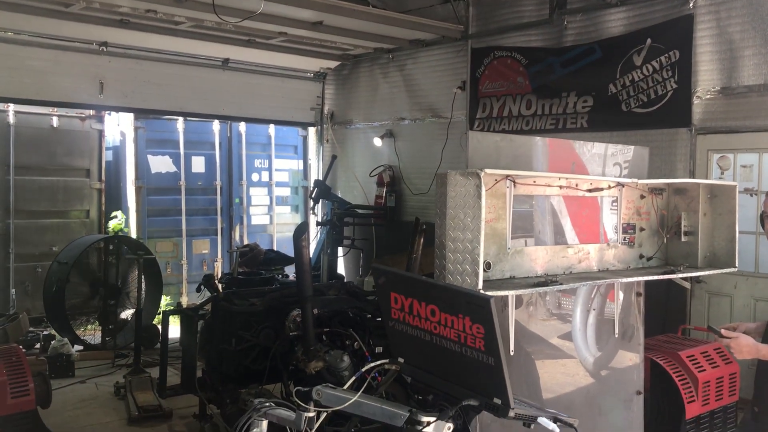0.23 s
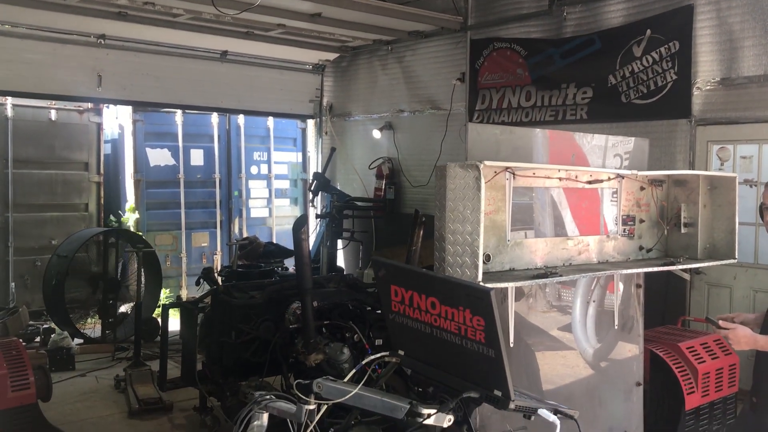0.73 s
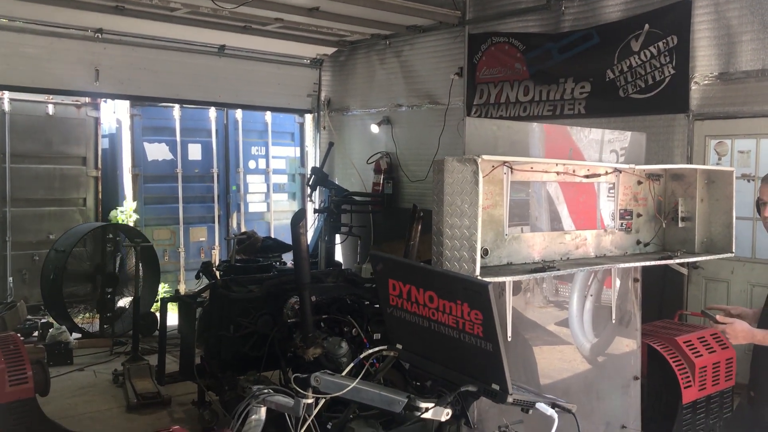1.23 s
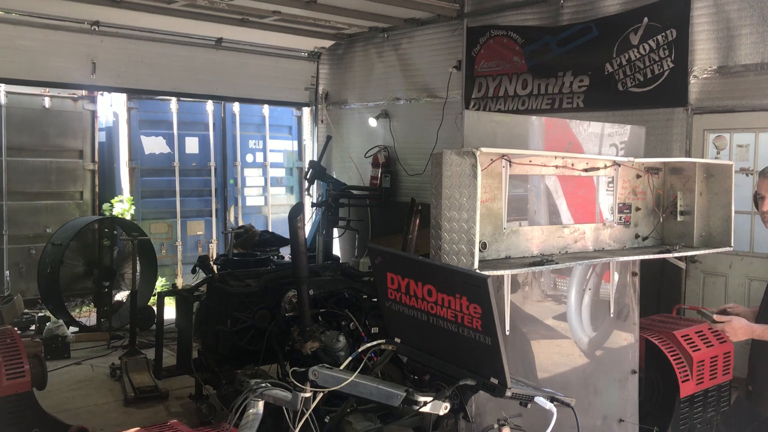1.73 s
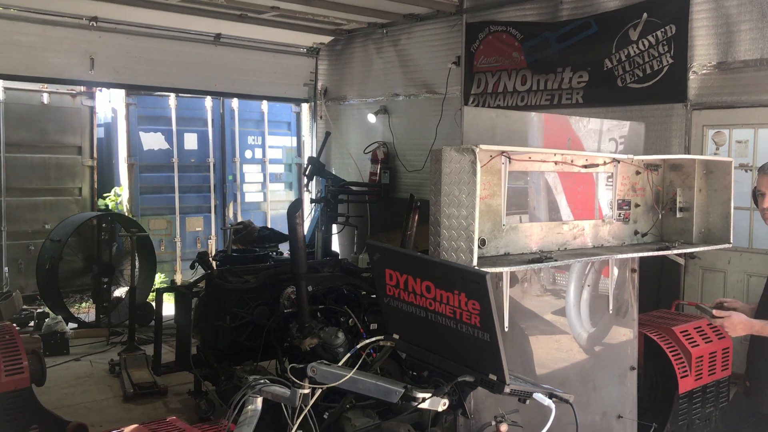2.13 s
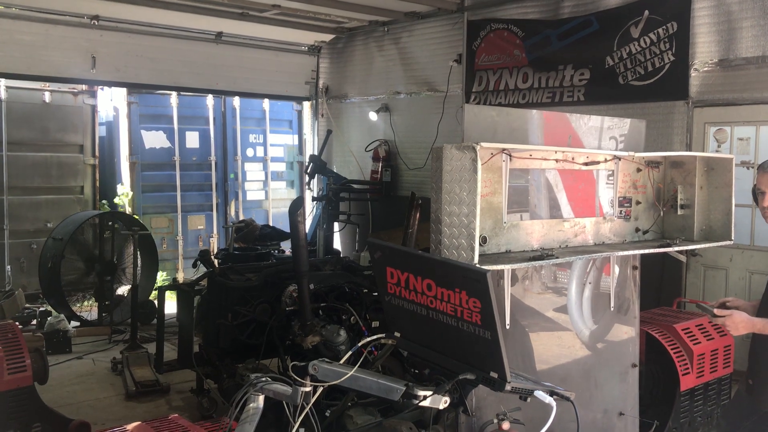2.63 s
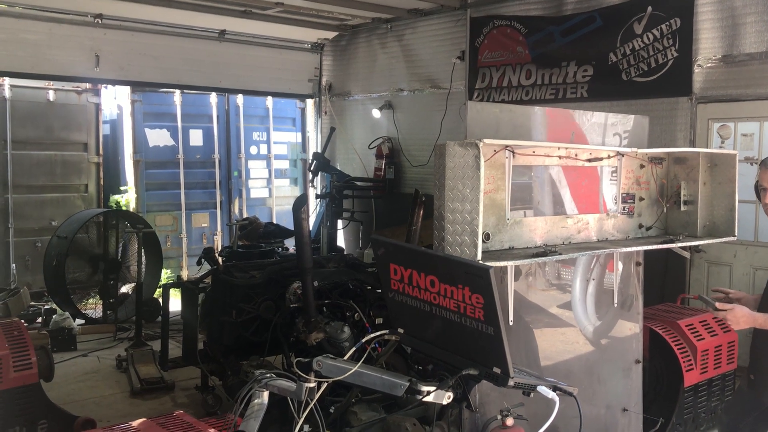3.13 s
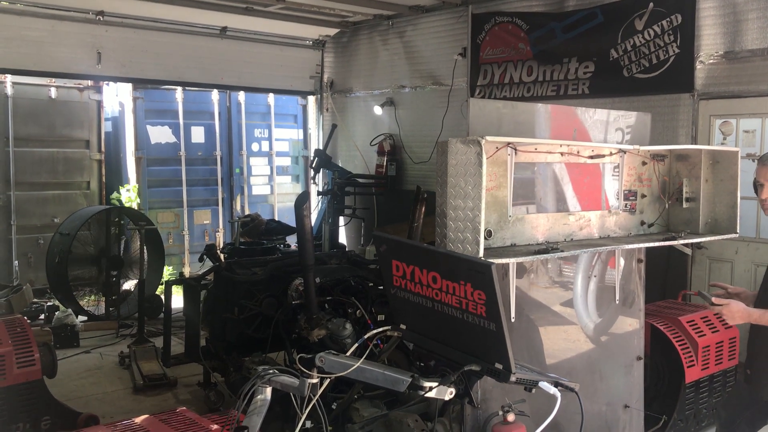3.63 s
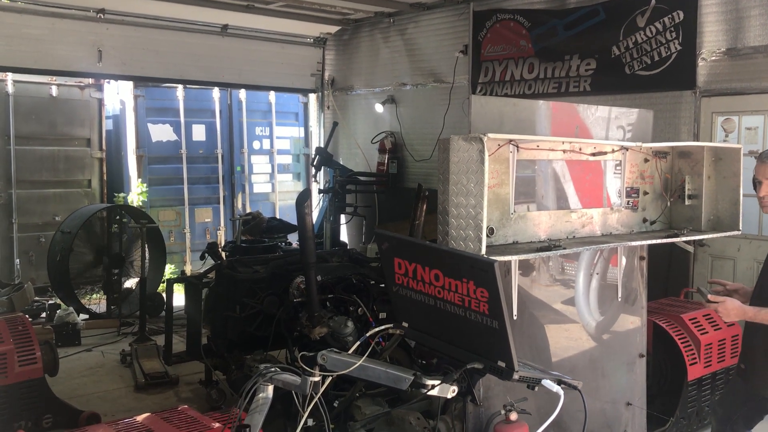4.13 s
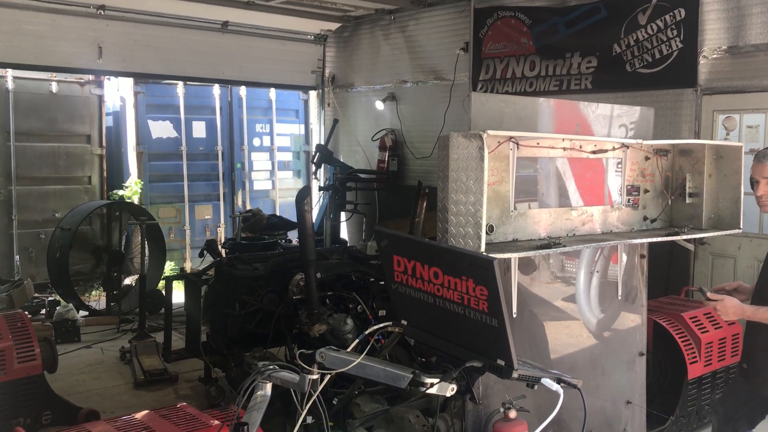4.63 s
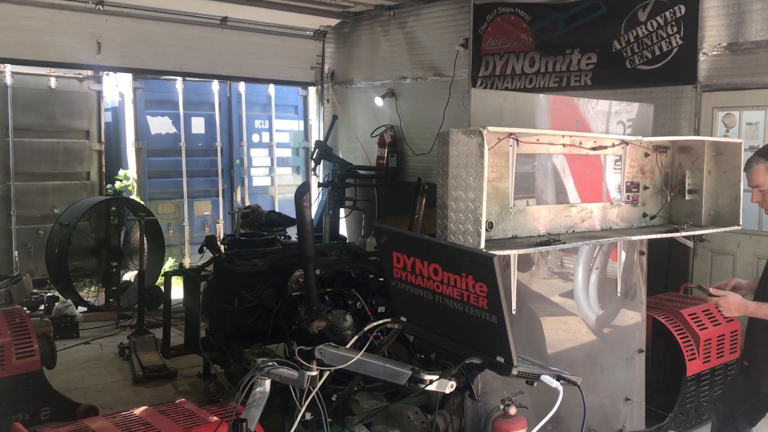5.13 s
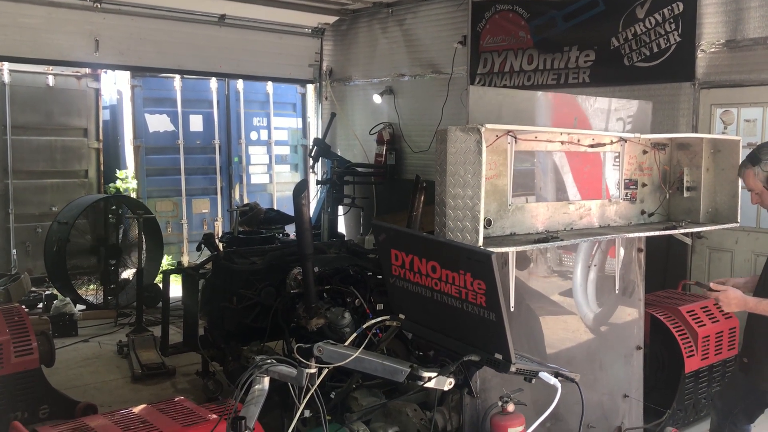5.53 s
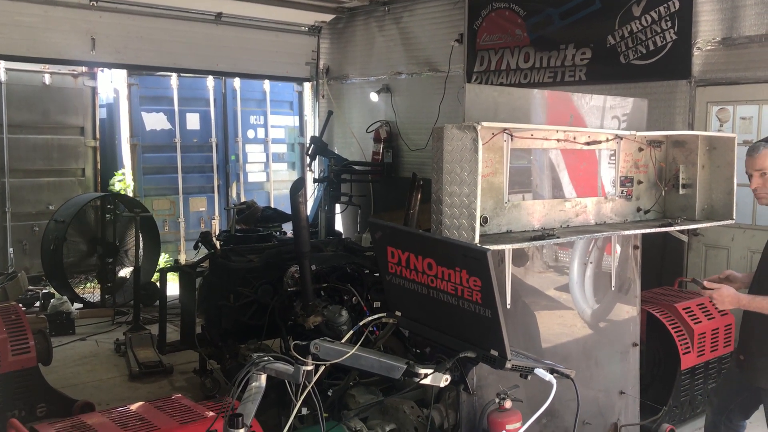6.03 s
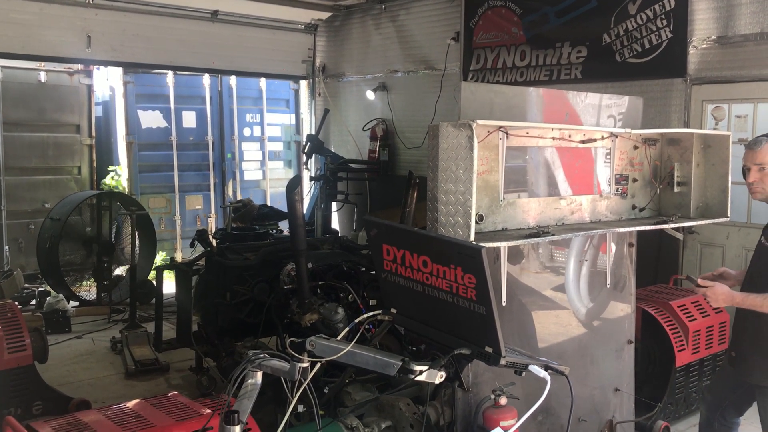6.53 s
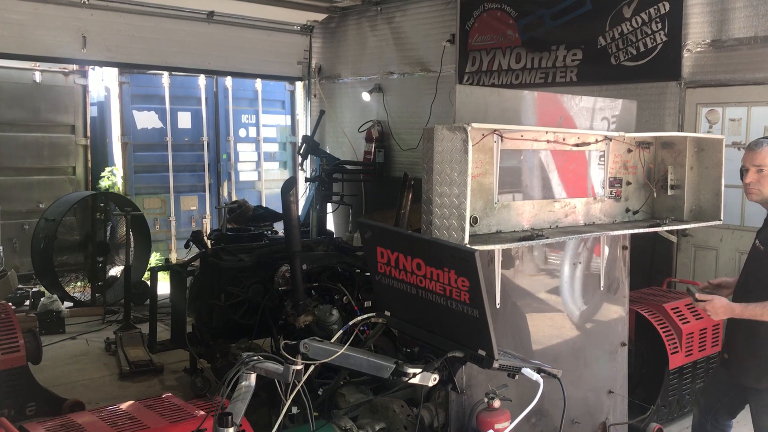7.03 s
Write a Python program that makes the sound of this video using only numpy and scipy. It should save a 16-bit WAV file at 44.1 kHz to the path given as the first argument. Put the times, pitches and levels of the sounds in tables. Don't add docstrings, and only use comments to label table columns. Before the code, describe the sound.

A big V8 with open exhaust stacks revs up, falls back, then roars loudly and climbs under load inside a sheet-metal workshop.

```python
import sys
import numpy as np
from scipy import signal
from scipy.fft import rfft, irfft
from scipy.io import wavfile
from scipy.ndimage import uniform_filter1d

SR = 44100
rng = np.random.default_rng(int(sys.argv[2]) if len(sys.argv) > 2 else 0)


def generate_wav(sig):
    pcm = np.round(np.clip(np.atleast_2d(sig).T, -1, 1) * 32767).astype(np.int16)
    wavfile.write(sys.argv[1], SR, pcm)


def elevation(decibels):
    levels = np.asarray(decibels, float)
    return 10 ** (levels / 20)


N = 321489
HZ = np.arange(N // 2 + 1) * SR / N
TIME = np.arange(N) / SR

# t/s, firing rate/Hz
CRANK_SPEED = [(-.398, 34.58), (.182, 71.21), (.512, 84.67), (1.092, 90.37), (1.722, 137.17),
               (2.082, 149.81), (2.682, 97.54), (3.022, 96.2), (3.542, 153.7), (3.762, 148.12),
               (4.162, 112.55), (4.412, 105.48), (5.092, 117.14), (5.862, 108.99), (6.142, 114.33),
               (6.602, 141.19), (7.062, 163.72), (7.702, 178.1)]
# t/s, jet level/dB
THROTTLE_FLOW = [(0, -28), (.14, -27.5), (.45, -30.5), (.8, -38.5), (.95, -38), (1.25, -29.5), (1.37, -31),
                 (1.5, -34.5), (2.0, -36), (2.4, -37), (2.85, -34), (3.05, -26.5), (3.4, -19), (3.9, -18),
                 (4.15, -20.5), (6.1, -20.5), (6.8, -18.5), (7.29, -17.5)]
# lope share (sign = bank), extra path/ms, jet level/dB
CYLINDERS = [(.22, .03, 1.2), (-1.6, -.3, -14), (.62, .33, -3), (.55, 0.0, -1), (-1.3, -.5, -15),
             (.7, .17, -3), (-1.3, -.32, -11), (-1.4, .48, -16)]
# firing rate/Hz, thump level/dB, lope level/dB
SHOP_ANSWER = [(60, -14.5, -21), (77, -10, -20), (92.5, -16, -20.5), (98.9, -21.5, -26),
               (111, -15.5, -15.5), (104.6, -11.5, -23), (129, -11, -21), (135.3, -11, -23),
               (143, -12.5, -18.5), (138, -13.5, -23), (156, -30, -18), (169, -19, -18)]
# f/Hz, lag/firing gaps
THUMP_LAG = [(60, -.5), (85, -.11), (100, 0.0), (113, .28), (130, .55), (145, .9), (168, 1.85)]
# f/Hz, width/Hz, level/dB
BOOM_MODES = [(68.4, 33, -7.5), (112.2, 17.5, 5.5), (140.6, 10.3, 3), (154, 14, -7), (179.7, 20.2, -4),
              (211.3, 3.2, -7), (275, 32.3, -4), (308, 16, -8), (347, 18.6, -10), (407.6, 17, -10.5)]
# f/Hz, width/Hz, level/dB
SHARED_MODES = [(226, 14, -9), (251.6, 28, -11.5), (422.4, 8.2, -13.5)]
# f/Hz, width/Hz, level/dB
SHEET_MODES = [(490, 95, -8.5), (568, 19, -3), (606, 39, -6), (645, 19.3, 2.5), (718, 43, -4),
               (812, 12.4, -0.5), (866, 21, -1), (934, 20, 1.5), (954, 3.5, 4.5), (980, 11, 2.5),
               (1052, 29, -0.5), (1168, 54, -4.5), (1224, 39, -3.5), (1244.5, 16, 0), (1341, 29, -6),
               (1433, 74, -10.5), (1552, 157, -9.5)]
# f/Hz, width/Hz, level/dB
COOL_MODES = [(589, 35, 1.5), (785, 30, 3)]
# f/Hz, density level/dB per Hz
JET_COLOUR = [(760, -20), (1300, -6), (1590, -1.5), (2040, -2.5), (2290, -1), (2730, -2.5), (3260, 0.5),
              (3980, -1), (4850, -5), (6990, -3.5), (8620, -6), (10300, -11), (12700, -11), (15200, -16.5),
              (15800, -22)]
# f/Hz, width/Hz, level/dB
PANEL_MODES = [(2560, 20, -0.5), (2480, 64, -12), (2871, 13, 3), (3150, 18, -12)]
JET_EDGES_HZ = [1200, 2800, 5200, 7800, 10400, 13000, 17000]
# t/s, f/Hz, level/dB
BELT_SQUEAL = [
    (.4, 1970, -82),
    (.5, 2030, -43),
    (.68, 2100, -49),
    (.85, 2160, -50),
]

FIRST_FIRING = 3.858
FLYWHEEL_S = .28
FULL_LOAD_DB = -20
THUMP_PER_LOAD, LOPE_PER_LOAD, BARK_PER_LOAD = 0.25, 0.078, 0.42
BARK_DB, BARK_DB_PER_HZ = -25, 0.0321
BLIP_S, BLIP_LENGTH_S, BLIP_BARK_DB = 1.18, 0.19, 4.5
GEAR_ORDER, GEAR_DB = 7, -28.5
HOWL_ORDER = 21 / 8
HOWL_DB, HOWL_DB_PER_HZ = -38.5, 0.2563
TOP_HZ = 15870


def crank():
    span = int(FLYWHEEL_S * SR)
    t_s = np.arange(-span, N + span) / SR
    hz = np.interp(t_s, *np.transpose(CRANK_SPEED))
    return uniform_filter1d(uniform_filter1d(hz, span), span)[span:-span]


def firings(phase, size, path_ms):
    count = np.arange(np.ceil(phase[0]), phase[-1] - 1).astype(int)
    at = np.interp(count, phase, np.arange(N)) + path_ms[count] * SR / 1000
    whole = at.astype(int)
    pulses = np.zeros(N)
    pulses[whole] = size[count] * (1 - at + whole)
    pulses[whole + 1] = size[count] * (at - whole)
    return pulses


def puffs(phase, size, width):
    nearest = np.round(phase).astype(int)
    return size[nearest] * np.exp(-((phase - nearest) / width) ** 2)


def thump(phase, hz, chance):
    wobble = uniform_filter1d(chance[phase.astype(int)], 800)
    lag = np.interp(hz, *np.transpose(THUMP_LAG))
    return np.sqrt(2) * elevation(.8 * wobble) * np.cos(2 * np.pi * (phase - lag))


def lope(phase, hz, push, path_ms, chance, idle):
    slow = np.clip((108 - hz) / 25, 0, 1)
    near = firings(phase, push * (push > 0), path_ms)
    far = firings(phase, push * (push < 0), path_ms)
    echoes = sum(shop(bank, t60_s=.35, treble_t60_s=.2, wet_db=-3) - bank for bank in (near, far))
    blows = (near + far + through(echoes, band(160, 760))) / np.std(near + far)
    shared = through(unit(firings(phase, np.ones_like(push), path_ms)), modes(SHARED_MODES))
    misfire = unit(firings(phase, chance, path_ms)) * (.1 + .35 * slow)
    swirl = through(rng.standard_normal(N), band(190, 700)) * (.22 + .3 * slow)
    boom = modes(BOOM_MODES) * band(52, 540) * band(40, 480)
    sound = through(blows + misfire + swirl, boom) + shared

    deep = through(sound, band(20, 155))
    top = through(sound, band(385, 700))
    deep_gain = elevation(-.13 * (hz - 71.5) * idle)
    top_gain = elevation(0.14 * (hz - 103) - 9.2 * idle)
    sound = sound + (deep_gain - 1) * deep + (top_gain - 1) * top

    upper = through(sound, band(153.4, 620))
    level = uniform_filter1d(np.abs(upper), SR // 4)
    return sound * uniform_filter1d(np.abs(steady(upper)), SR // 4) / level


def bark(phase, hz, push, path_ms, jet_db, chance, idle):
    blows = unit(firings(phase, push * elevation(2.5 * chance), path_ms))
    even = unit(firings(phase, np.ones_like(push), path_ms))
    puff = (.5 + puffs(phase, elevation(.5 * jet_db), width=0.37)) * rng.standard_normal(N)
    gear = np.cos(2 * np.pi * GEAR_ORDER * phase)
    drive = 0.5 * blows + 0.27 * even + elevation(GEAR_DB) * gear + unit(puff)
    rung = through(drive, modes(SHEET_MODES) * band(454, 2000))
    cool = np.clip((96 - hz) / 9, 0, 1)
    rung = rung + cool * through(rung, np.abs(modes(COOL_MODES)))
    return steady(rung - 0.79 * idle * through(rung, 1 - band(630, 550)))


def jets(phase, rate, jet_db, chance, load_db, idle):
    hz, db = np.transpose(JET_COLOUR)
    colour = elevation(np.interp(np.log(HZ + 1), np.log(hz), db)) * np.abs(1 + modes(PANEL_MODES))
    choked = elevation(-1.8 * np.clip(-32.5 - load_db, 0, 6))
    # roar under load, extra roar at idle, dB gained per dB of load
    bands = [(0.69, 0.19, 0.27), (1.0, -0.34, 0.29), (0.52, 0.04, 0.21),
             (0.49, -0.29, -0.26), (0.57, -0.32, -0.3), (0.31, -0.1, -0.39)]
    out = 0
    for k, (bed, idle_bed, thin) in enumerate(bands):
        spread_db = np.minimum(2.4 * chance[0] + 3.6 * chance[k + 1], 5.)
        crack = choked * puffs(phase, elevation(jet_db + spread_db), width=.28)
        flow = (bed + idle_bed * idle + crack) * rng.standard_normal(N)
        part = through(unit(flow), colour * band(*JET_EDGES_HZ[k:k + 2]))
        treble = max(k - 2, 0)
        gain = elevation(thin * (load_db + 18) - 0.0051 * treble * (rate - 110))
        out = out + gain * choked ** (0.22 * treble) * part
    return steady(out)


def howl(phase, hz, idle):
    return elevation(HOWL_DB + HOWL_DB_PER_HZ * (hz - 111)) * idle * np.cos(2 * np.pi * HOWL_ORDER * phase)


def whine():
    t_s, hz, db = np.transpose(BELT_SQUEAL)
    tone = np.sin(2 * np.pi * np.cumsum(np.interp(TIME, t_s, hz)) / SR)
    return elevation(np.interp(TIME, t_s, db, left=-120, right=-120)) * tone


def rumble():
    return unit(through(rng.standard_normal(N), band(28, 52)))


def shop(x, t60_s, treble_t60_s, wet_db):
    age_s = TIME[:SR]
    low, high = (rng.standard_normal(SR) * np.exp(-np.log(1000) * age_s / t60) * (age_s > .006)
                 for t60 in (t60_s, treble_t60_s))
    dull = 1 / (1 + (HZ / 4000) ** 2)
    tail = rfft(low, N) * dull + rfft(high, N) * (1 - dull)
    echoes = elevation(wet_db) * irfft(tail, N)[:SR] / np.sqrt(np.sum(low ** 2))
    already = np.r_[x[SR:0:-1], x]
    return x + signal.fftconvolve(already, echoes)[SR:SR + N]


def modes(table):
    response = 0
    for k, (f, w, db) in enumerate(table):
        response = response + (-1) ** k * elevation(db) * 1j * w * HZ / (f ** 2 - HZ ** 2 + 1j * w * HZ)
    return response


def band(lo_hz, hi_hz):
    return 1 / np.sqrt((1 + (lo_hz / (HZ + 1)) ** 8) * (1 + (HZ / hi_hz) ** 8))


def through(x, response):
    return irfft(rfft(x) * response, N)


def unit(x):
    return x / np.sqrt(np.mean(x ** 2))


def steady(x, hold_s=0.32):
    span = int(hold_s * SR)
    return x / np.sqrt(uniform_filter1d(uniform_filter1d(x ** 2, span), span))


def scene():
    hz = crank()
    phase = FIRST_FIRING + np.cumsum(hz) / SR
    gas_db = np.interp(TIME, *np.transpose(THROTTLE_FLOW))
    load_db = gas_db - FULL_LOAD_DB
    idle = np.clip((-21 - gas_db) / 12, 0, 1)
    blip_db = BLIP_BARK_DB * np.exp(-((TIME - BLIP_S) / BLIP_LENGTH_S) ** 2)

    rate, thump_db, lope_db = np.transpose(SHOP_ANSWER)
    thump_db = np.interp(hz, rate, thump_db) + THUMP_PER_LOAD * load_db + 1.3 * blip_db
    lope_db = np.interp(hz, rate, lope_db) + LOPE_PER_LOAD * load_db + 0.87 * blip_db - 0.34
    bark_db = BARK_DB + BARK_PER_LOAD * load_db + BARK_DB_PER_HZ * (hz - 110) + blip_db

    chance = rng.standard_normal((int(phase[-1]) + 2, 10)).T
    push, path_ms, jet_db = np.array(CYLINDERS)[np.arange(chance.shape[1]) % 8].T

    low = elevation(thump_db) * thump(phase, hz, chance[8])
    low = low + elevation(lope_db) * lope(phase, hz, push, path_ms, chance[9], idle)
    low = low + howl(phase, hz, idle)
    middle = elevation(bark_db) * bark(phase, hz, push, path_ms, jet_db, chance[7], idle)
    high = elevation(gas_db) * jets(phase, hz, jet_db, chance, gas_db, idle)
    high = shop(high + whine(), t60_s=.7, treble_t60_s=.35, wet_db=-4)
    return (low + middle + high + elevation(gas_db - 26) * rumble())[None]


def band_limit(x):
    return signal.sosfilt(signal.butter(12, 15960, fs=SR, output="sos"), x)


def record(dry):
    ceiling = .74
    rounded = dry / (1 + np.abs(dry / ceiling) ** 4) ** .25
    mix = through(rounded, 1 / (1 + (HZ / TOP_HZ) ** 200))
    return band_limit(mix)


dry = scene()
out = record(dry)
generate_wav(out)
```